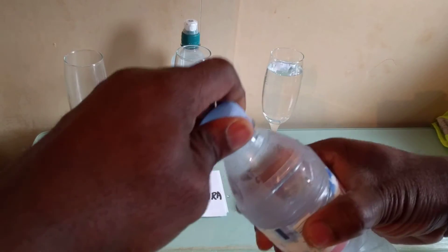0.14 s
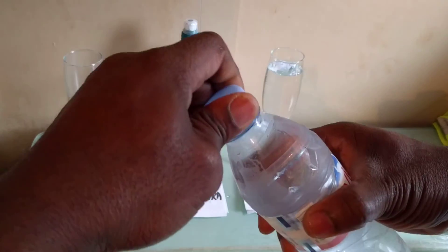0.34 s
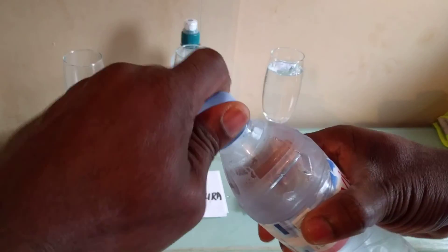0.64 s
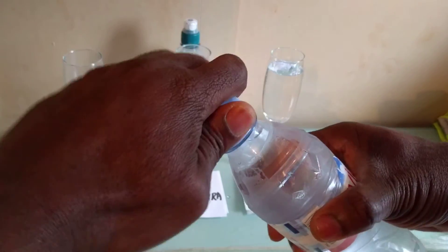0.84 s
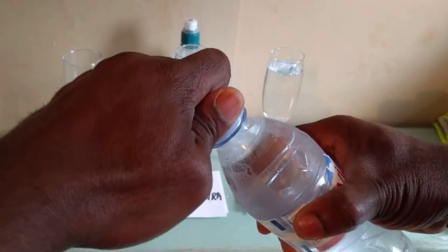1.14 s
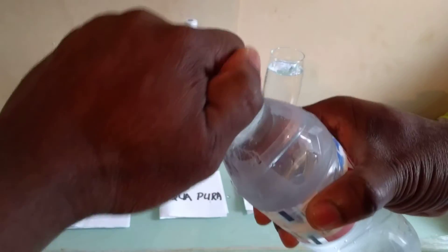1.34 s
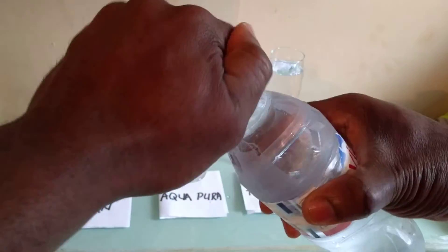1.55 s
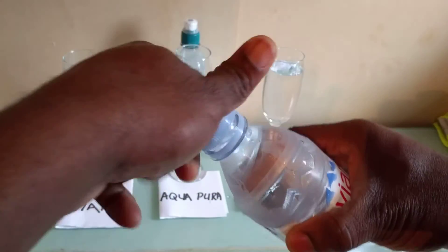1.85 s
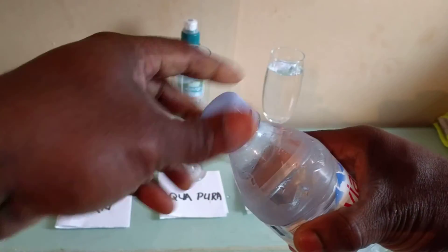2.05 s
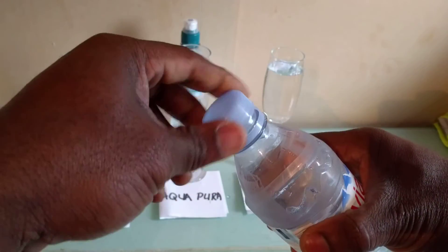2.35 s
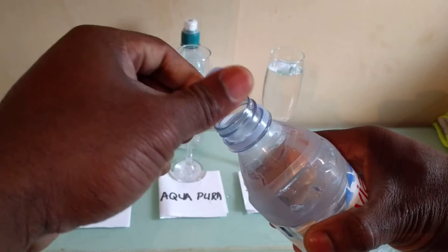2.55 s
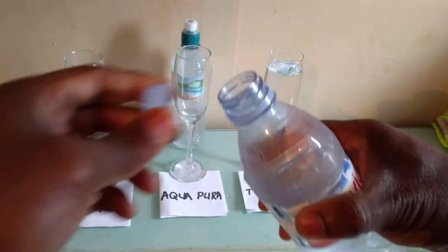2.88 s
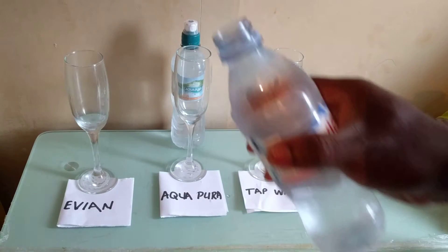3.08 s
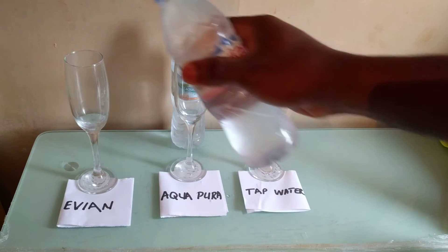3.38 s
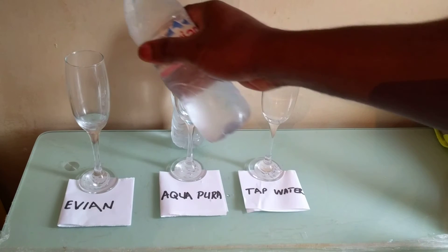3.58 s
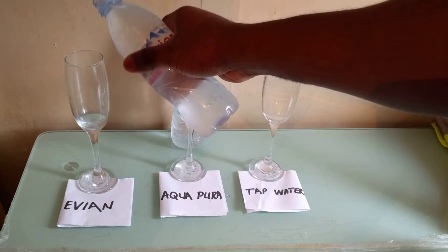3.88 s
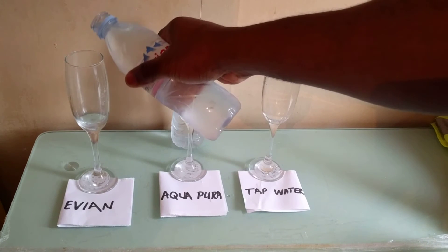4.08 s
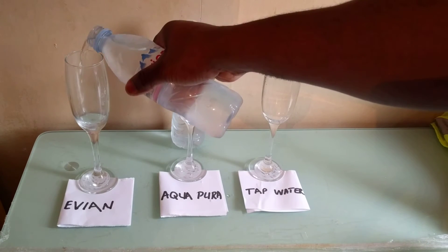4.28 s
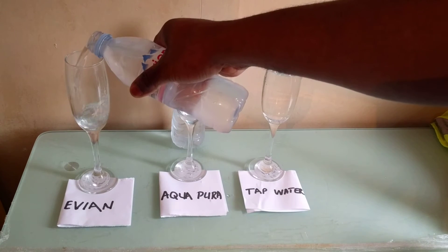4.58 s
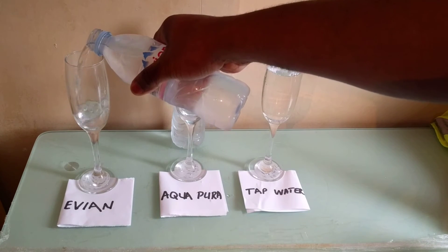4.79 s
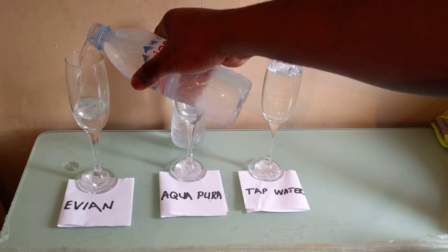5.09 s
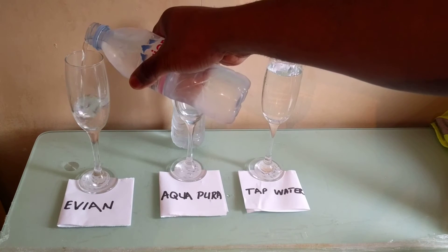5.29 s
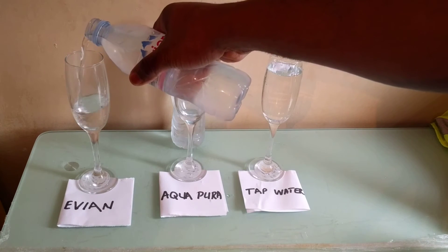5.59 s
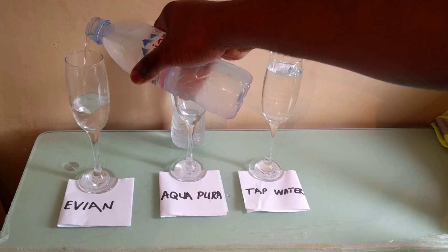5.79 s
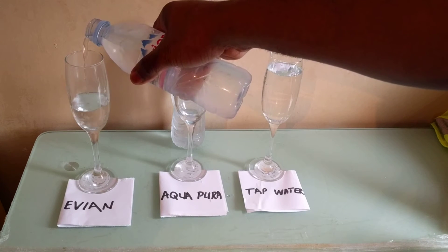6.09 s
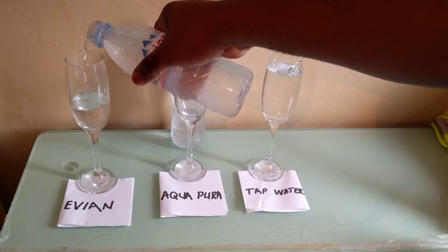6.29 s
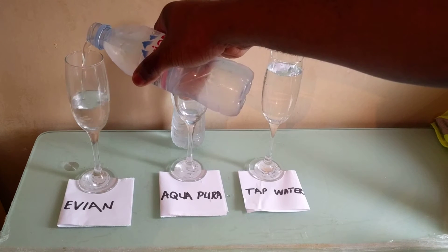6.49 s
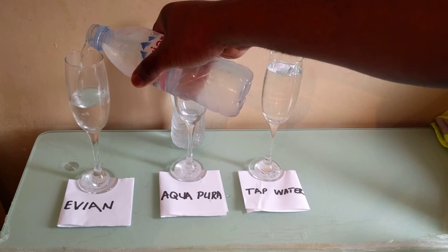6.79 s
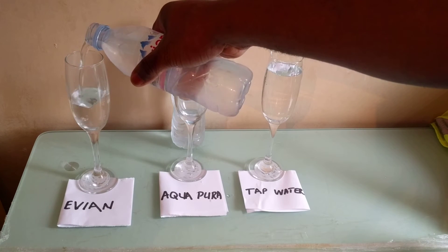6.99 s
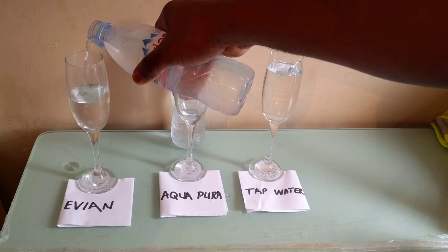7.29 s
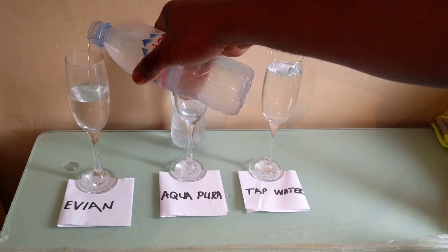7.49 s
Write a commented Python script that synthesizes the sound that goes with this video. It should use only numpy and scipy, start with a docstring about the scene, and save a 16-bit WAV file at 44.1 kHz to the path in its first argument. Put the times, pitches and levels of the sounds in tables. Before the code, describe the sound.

Close to the microphone, fingers twist a plastic cap off a water bottle: a few ticks, hard bright cracks as the seal breaks, gritty thread scrapes and small clicks. After a quiet gap and a faint hand rustle, water trickles into a tall glass with splats, bubbles and glugs, then thins to sparse drips. Small quiet room, steady hiss and low rumble.

```python
"""Fingers twist a plastic cap off a water bottle close by: the seal snaps, the thread scrapes, the bottle creases.
Then an unsteady trickle falls into a tall glass: splats, bubbles and glugs, the glass ringing faintly.
A small quiet room answers, over steady hiss and low rumble.
Snaps and splats are noise bursts through resonances, bubbles are fading sines, scrapes and flow are shaped noise."""
import sys
import numpy as np
from scipy import signal
from scipy.fft import rfft, irfft, next_fast_len
from scipy.io import wavfile
from scipy.ndimage import uniform_filter1d, map_coordinates

SR = 44100
rng = np.random.default_rng(int(sys.argv[2]) if len(sys.argv) > 2 else 0)


def unload_audio(sound):
    """Save the sound as a 16-bit wav file, at the path given as the first command line argument."""
    columns = np.transpose(np.atleast_2d(sound))
    # keep every value between -1 and 1, then stretch to whole-number steps
    steps = np.round(np.clip(columns, -1, 1) * 32767)
    wavfile.write(sys.argv[1], SR, steps.astype(np.int16))


N = 336953  # length of the scene [samples]

# In all tables and settings, t60 is the time a sound takes to fade by 60 dB.
# Drops striking water or glass:
# (time [s], level before a fixed cut [dB], brightness [dB per octave], glass ring against that level [dB])
DROPS = [(4.331, -47, 12, -27), (4.3737, -50, 8, -38), (4.4064, -50, 12, -33), (4.4642, -48, 9.5, -19),
         (4.5244, -38, 3, -18.5), (4.545, -28.5, 15, -31), (4.5899, -33, 17, -42), (4.6483, -37, 0.9, -31),
         (4.7202, -31.5, 2, -45), (4.8265, -37, 6.5, -18), (4.876, -46, 0.5, -19), (4.9493, -46, 3, -23),
         (4.968, -33.5, 1.5, -36), (4.998, -27.5, 8, -26.5), (5.1098, -40, 10, -35),
         (5.1976, -51.5, -3, -15), (5.2155, -45.5, 4, -17), (5.2335, -49, 1.5, -22),
         (5.2471, -30, 6.5, -35), (5.3263, -36.5, 8, -30), (5.386, -42.5, 1.2, -14), (5.4844, -43, 12, -36),
         (5.5114, -49.5, -.6, -18), (5.595, -46.5, 2, -32), (5.623, -39, 8, -33), (5.659, -55, 0, -24),
         (5.7265, -47, 2.5, -28), (5.7852, -43, 14, -29), (5.8083, -44, 9, -27), (5.8395, -24.5, 15.5, -38),
         (5.861, -31.5, 5, -30), (5.9007, -40.5, -1, -9), (5.9229, -32, 7.5, -41),
         (6.0219, -43.5, 2.1, -32), (6.0664, -49, 15, -35), (6.0833, -42.5, 11, -33),
         (6.1549, -51, 14, -30), (6.2092, -45.5, 3.5, -27), (6.259, -44, 2, -33), (6.4198, -48, 8, -34),
         (6.5046, -57.5, -4, -7), (6.6198, -63, 6, -17), (6.7825, -57, 11, -20), (6.872, -50, -2.5, -5),
         (6.967, -51, 13, -24), (7.2005, -59, 6, -21), (7.2383, -63, -1, -22), (7.3202, -42, 18, -35),
         (7.3467, -60, 5, -23), (7.418, -51, 4, -25), (7.5337, -60, -4, -20)]
# How strongly the water runs: (time [s], bubbling level [dB], spray level [dB])
WATER_FLOW = [(4.25, -88, -85), (4.42, -84, -76), (4.56, -73, -68), (4.68, -70.5, -56), (4.89, -70, -77.5),
              (5.0, -68.5, -52), (5.08, -67.5, -72), (5.25, -66.5, -75), (5.44, -72, -72),
              (5.57, -72.5, -73), (5.86, -76.5, -73), (6.03, -93, -77), (6.23, -74, -75), (6.57, -86, -84),
              (7.12, -91, -85), (7.64, -86, -85)]


def amp(db):
    """Turns decibels into a plain factor."""
    return 10 ** (np.asarray(db) / 20)


def unit(x):
    """Scales a sound to an average strength (rms) of 1."""
    return x / np.sqrt(np.mean(x ** 2) + 1e-20)


def along(points, hz):
    """Reads a curve of (Hz, value) points on a log frequency axis."""
    f, v = np.transpose(points)
    return np.interp(np.log(hz + 1), np.log(f + 1), v)


def curves(rows):
    """One value per sample for each column after the time; practically silent outside the table."""
    s, *cols = np.transpose(rows)
    return [np.interp(np.arange(N) / SR, s, c, left=-150, right=-150) for c in cols]


def wobble(rate):
    """A smooth random curve through `rate` random points a second."""
    points = rng.standard_normal(int(N * rate / SR) + 4)
    return map_coordinates(points, [np.arange(N) * rate / SR])


def filtered(x, response):
    """Multiplies the spectrum of x by a complex response of frequency."""
    m = next_fast_len(N + SR // 2)
    return irfft(rfft(x, m) * response(np.fft.rfftfreq(m, 1 / SR)), m)[..., :N]


def resonant(x, modes):
    """Sends x through resonances (Hz, width Hz, dB), scaled so that white noise keeps its power."""
    def gain(f):
        total = 0
        for k, (center, width, db) in enumerate(modes):
            peak = 1j * f * width / (center * center - f * f + 1j * f * width)
            total = total + (-1) ** k * amp(db) * peak  # neighbours have opposite signs
        return total

    return filtered(x, gain) / np.sqrt(np.mean(abs(gain(np.arange(SR // 2))) ** 2))


def narrow(hz, width_hz):
    """A band of noise, rms 1, around a moving pitch."""
    slow = filtered(rng.standard_normal((2, N)), lambda f: 1 / (1 + (f / width_hz) ** 2))
    phase = 2 * np.pi * np.cumsum(hz) / SR
    return unit(slow[0] * np.cos(phase) + slow[1] * np.sin(phase))


def laid(times, rows):
    """Adds each row of samples into the scene at its start time."""
    at = np.round(np.asarray(times) * SR).astype(int)[:, None] + np.arange(rows.shape[1])
    return np.bincount(at.ravel(), rows.ravel(), N + SR)[:N]


def bursts(times, db, shares_db, t60, groups, spiky_db):
    """A sharp crack with a fading, spiky noise tail drives each group of resonances by its own share."""
    t = np.arange(SR // 20) / SR
    noise, spikes = rng.standard_normal((len(times), 2, len(t))).transpose(1, 0, 2)
    shape = amp(-60 * t / t60) * (1 + 1.39 * np.exp(-t / 0.00066))
    burst = amp(spiky_db * unit(uniform_filter1d(spikes, size=12))) * noise * shape
    # every burst gets the energy of its smooth shape
    burst = burst * np.linalg.norm(shape, axis=-1, keepdims=True) / np.linalg.norm(burst, axis=1, keepdims=True)
    out = np.zeros(N)
    for share, modes in zip(shares_db, groups):
        out += resonant(laid(times, amp(db + share)[:, None] * burst), modes)
    return out


def rings(times, hz, db, t60, attack, rise, waver, size):
    """Fading sines whose pitch climbs by the share `rise` during t60 and wavers at random."""
    t = np.arange(size) / SR
    hz, db, t60, waver = (np.reshape(v, (-1, 1)) for v in (hz, db, t60, waver))
    drift = waver * np.cumsum(rng.standard_normal((len(times), size)), axis=1) * np.sqrt(hz / SR)
    turns = hz * (t + rise * t * t / (2 * t60)) + drift
    strength = amp(db - 60 * t / t60) * (1 - np.exp(-t / attack))
    return laid(times, strength * np.sin(2 * np.pi * turns))


def floor():
    """Steady rumble and hiss are noise with a shaped spectrum; a narrow band adds a fuzzy tone."""
    # Spectrum of rumble and hiss: (frequency [Hz], relative level [dB])
    hiss_spectrum = [(13, -66), (22, 8.5), (60, -2.5), (149, -6), (176, -12.5), (238, -9.5), (281, -11),
                     (314, -15.5), (476, -14), (926, -17), (1090, -22), (1360, -20), (8970, -27),
                     (15200, -20.5), (16500, -46.5)]
    # The fuzzy tone: (pitch [Hz], width [Hz], level [dB])
    whine = (1105, 28, -79)
    hiss_db = -63.5
    hiss = unit(filtered(rng.standard_normal(N), lambda f: amp(along(hiss_spectrum, f))))
    hz, width, db = whine
    tone = resonant(rng.standard_normal(N), [(hz, width, 0)])
    return amp(hiss_db + 0.49 * wobble(1.0)) * hiss + amp(db) * tone


def snaps():
    """Plastic lets go suddenly: seal, thread and bottle wall crack; the cap rings at a pitch set by the grip.
    Returns the direct sound and a shorter burst with a softer ring, which feeds the room tail."""
    # Cap and bottle snaps, with the level of each part that answers:
    # (time before a fixed 0.9 ms delay [s], neck [dB], wall [dB], rim [dB], crack [dB], cap ring [dB])
    snap_table = [(.147, -78, -76, -57.5, -58, -75), (.563, -82, -82, -61, -70, -63),
                  (0.603, -75, -59, -36.5, -33.5, -29.5), (0.614, -64, -65, -54, -52, -43),
                  (.637, -73, -62, -58, -64, -43.5), (0.839, -75, -46, -41.5, -50, -51),
                  (1.309, -47.5, -38, -29, -23.5, -63), (1.388, -63, -60, -60, -34, -66),
                  (1.434, -78, -63, -53, -68, -76), (1.463, -77, -63.5, -54, -53, -76),
                  (1.629, -61, -31, -28, -28, -21.5), (1.655, -45.5, -24, -20, -20.5, -23.5),
                  (1.691, -57, -35, -23, -19.5, -34.5), (1.825, -58, -57, -45.5, -46, -64),
                  (1.88, -27, -37, -44, -35, -53), (1.939, -44.5, -51, -66, -52, -40),
                  (1.944, -54, -41, -58, -44.5, -33), (2.133, -43.5, -42.5, -41.5, -37.5, -38),
                  (2.238, -58, -62, -70, -66, -56), (2.253, -45.5, -52, -47, -45, -50),
                  (2.258, -74, -45, -59, -58, -51), (2.347, -58, -51, -73, -64, -54),
                  (2.406, -58, -61, -51, -45, -54), (2.445, -61, -63, -58, -53, -58),
                  (3.049, -67, -65, -51, -51, -77), (3.116, -73, -59, -46.5, -38.5, -77),
                  (3.175, -52.5, -34, -33, -25, -45), (3.22, -61, -59, -50, -46, -64),
                  (3.259, -65, -59, -57, -52, -71), (3.927, -74, -62, -68, -60, -75)]
    # Pitch of the cap ring as the grip changes: (time [s], pitch [Hz])
    grip = [(.6, 4215), (.64, 4220), (.84, 3870), (1.63, 3475), (1.7, 3415), (1.94, 3880), (2.13, 3910),
            (2.4, 3600), (3.18, 4670)]
    # Resonances of the neck, wall, rim and crack: each (frequency [Hz], width [Hz], relative level [dB])
    plastic = [
        [(790, 280, 0), (1400, 900, -5)],
        [(2000, 1100, -1.5), (3700, 2000, 0)],
        [(5400, 1800, 0), (8500, 2600, 0)],
        [(11000, 3000, -2.2), (14000, 3500, 0)],
    ]
    loudest_t60_s, longer_per_db = 0.031, 0.02  # a snap at 0 dB; weaker ones die sooner by this share a dB
    short_t60_s = .0012
    s, *parts_db, ring_db = np.transpose(snap_table)
    t60 = loudest_t60_s * np.exp(longer_per_db * np.max(parts_db, axis=0))
    hz = np.interp(s, *np.transpose(grip))
    s = s + .3 / 343  # all snaps start 0.9 ms after their table times
    ring = rings(s, hz, ring_db, 1.8 * t60, attack=.0004, rise=0, waver=.05, size=SR // 10)
    short_db = 10 * np.log10(t60 / short_t60_s) - 3.5  # makes up for the shorter burst
    short = bursts(s, short_db, parts_db, short_t60_s, plastic, spiky_db=-1.5)
    direct = bursts(s, 0, parts_db, t60[:, None], plastic, spiky_db=2.5)
    return direct + ring, short + 0.55 * ring


def room(x, size=SR // 8):
    """Each frequency dies at its own speed; each eighth of a second of sound gets a fresh random noise tail."""
    # How long the room rings: (frequency [Hz], t60 [s])
    room_fade = [(500, 0.098), (1500, 0.19), (3500, 0.15), (10000, 0.13)]
    out = np.zeros(N + SR)
    for start in range(0, N, size):
        hz, t, z = signal.stft(rng.standard_normal(SR // 3), SR, nperseg=128)
        fading = z * amp(-60 * t / along(room_fade, hz)[:, None])
        tail = signal.istft(fading, SR, nperseg=128)[1]
        answer = signal.fftconvolve(x[start:start + size], tail / np.linalg.norm(tail))
        out[start + 260:][:len(answer)] += answer  # about 6 ms after the direct sound
    return out[:N]


def scrape():
    """Clumped sticking and slipping stirs the cap and the air in the neck, whose pitch glides as the cap turns."""
    # The cap scrapes on its thread: (start [s], hardest [s], end [s], grit level [dB], rasp level [dB],
    # rasp pitch [Hz], neck air level [dB], neck air from [Hz], neck air to [Hz])
    strokes = [(0.553, 0.577, .61, -56, -61, 4290, -62, 900, 905),
               (1.242, 1.268, 1.31, -54.5, -71, 4000, -70, 1190, 1096),
               (1.64, 1.704, 1.787, -37.5, -49, 3380, -81, 1002, 1007),
               (1.722, 1.79, 1.98, -55, -65, 3640, -63, 2050, 2260),
               (1.88, 1.892, 1.95, -75, -70, 3800, -58, 845, 796),
               (2.308, 2.354, 2.47, -54.5, -52.5, 3760, -59, 2200, 2200),
               (2.363, 2.404, 2.45, -57, -57.5, 3760, -47.5, 949, 1554),
               (2.408, 2.457, 2.51, -58, -64, 3700, -58, 1200, 2006)]
    fade_db = 27  # from the hardest moment to either end
    slips = amp(4 * wobble(400) + 2 * wobble(45))
    grit_modes = [(2400, 6600, 0.5), (5800, 3800, 7.5), (13500, 38000, 2.5)]
    grit = unit(resonant(slips * rng.standard_normal(N), grit_modes))
    out, t = np.zeros(N), np.arange(N) / SR
    for start, hardest, end, grit_db, rasp_db, rasp_hz, neck_db, from_hz, to_hz in strokes:
        reach = np.interp(t, [start, hardest, end], [1, 0, 1])  # 0 at the hardest moment, 1 at the ends
        pressure = amp(-fade_db * reach ** 1.35) * (reach < 1)
        rasp = unit(slips * narrow(np.full(N, rasp_hz), width_hz=310))
        neck = unit(slips * narrow(np.interp(t, [start, end], [from_hz, to_hz]), width_hz=280))
        out += pressure * (amp(grit_db) * grit + amp(rasp_db) * rasp + amp(neck_db) * neck)
    return out


def rustle():
    """Skin slides over the bottle wall: unsteady noise through two broad resonances."""
    # The hand shifts on the bottle: (time [s], level [dB])
    hand_shift = [(3.26, -67.5), (3.4, -72.5), (3.5, -67.5), (3.62, -68), (3.75, -73.5), (3.95, -81)]
    skin = amp(1.5 * wobble(87)) * rng.standard_normal(N)
    return amp(curves(hand_shift)[0]) * unit(resonant(skin, [(2150, 4900, 0), (12900, 2600, -1.5)]))


def gurgle():
    """Water and air change places low in the bottle: wandering low noise in bell-shaped swells."""
    # Swells: (middle [s], length [s], level at the middle [dB])
    swell_table = [(4.102, 0.8, -77), (5.185, 0.76, -66), (5.858, 0.42, -67.5)]
    t = np.arange(N) / SR
    swells = np.zeros(N)
    for middle, length, db in swell_table:
        swells += amp(db) * np.cos(np.pi * np.clip((t - middle) / length, -.5, .5))
    return swells * unit(amp(2.9 * wobble(12)) * narrow(330 + 70 * wobble(6), width_hz=150))


def hums():
    """Soft low tones: each a steady sine under a bell-shaped swell."""
    # Faint hums: (start [s], length [s], pitch [Hz], level at the middle [dB])
    hum_table = [(3.72, 0.12, 457, -64), (4.08, 0.1, 218, -65.5), (4.29, 0.087, 154, -63.5),
                 (5.14, 0.093, 242, -64), (5.277, 0.12, 255.5, -66), (5.67, 0.17, 143, -60.5),
                 (5.815, 0.14, 330, -60.5)]
    s, length, hz, db = np.transpose(hum_table)[:, :, None]
    t = np.arange(SR // 4) / SR
    swell = np.sin(np.pi * np.clip(t / length, 0, 1))
    return laid(s[:, 0], amp(db) * swell * np.sin(2 * np.pi * hz * t))


def swarm(low_hz, high_hz, count):
    """Small random bubbles ring in clumps; rms 1 from the start of the flow."""
    start = WATER_FLOW[0][0]
    u, size_db = rng.random((count, 3)), 6.5 * rng.standard_normal(count)
    times = start + u[:, 0] * (N / SR - start)
    hz = low_hz * (high_hz / low_hz) ** u[:, 1]
    t60 = (12 + 60 * u[:, 2]) / hz  # 12 to 72 turns
    small = rings(times, hz, size_db, t60, attack=0.0012, rise=.15, waver=0.046, size=800)
    small = small * amp(3 * wobble(35))
    return small / small[int(start * SR):].std()


def trickle():
    """Bubbling and spray follow the flow over a wash of noise, and stir the air column above the water."""
    # Resonances of the air above the water: (frequency [Hz], width [Hz], relative level [dB])
    air_column = [(992, 186, 23), (2080, 130, -12), (3180, 280, -35)]
    shallow_db, deep_db = -4, 2  # air column against the bubbling, before and after the water pools
    pool_s, fill_s = 5.02, 0.59  # middle and length of that change
    bubbling_db, spray_db = curves(WATER_FLOW)
    change_s = [pool_s - fill_s / 2, pool_s + fill_s / 2]
    column_db = bubbling_db + np.interp(np.arange(N) / SR, change_s, [shallow_db, deep_db])
    column = unit(resonant(amp(3.0 * wobble(40)) * rng.standard_normal(N), air_column))
    wash_noise = amp(13.0 * wobble(60)) * rng.standard_normal(N)
    wash = unit(resonant(wash_noise, [(2280, 630, 0), (3970, 8200, -2)]))
    bubbling, spray = swarm(1773, 6800, count=3200), swarm(6160, 15800, count=4000)
    return amp(bubbling_db) * (bubbling + 0.28 * wash) + amp(spray_db) * spray + amp(column_db) * column


def splats():
    """Each drop cracks on the surface and sets the wall of the glass ringing."""
    # Three groups of splash resonances: each (frequency [Hz], width [Hz], relative level [dB])
    water = [
        [(2150, 210, -2.5), (3480, 490, 2)],
        [(5270, 940, 0), (7900, 2200, 0)],
        [(12900, 3100, 0.014), (15500, 2500, 0.045)],
    ]
    # How far each group lies above the lowest: (distance [octaves])
    water_octaves = [0, 1.25, 2.3]
    # The ringing wall of the glass: (pitch [Hz], level against the drop's ring [dB], t60 [s])
    glass = [(1952, -8.5, 0.43), (5300, -20, 0.19), (8300, -20, 0.14)]
    middle_dip_db = -1  # the middle group is weaker
    s, db, brightness, ring_db = np.transpose(DROPS)
    shares = brightness * np.c_[water_octaves] + np.c_[[0, middle_dip_db, 0]]
    shares = shares - shares.max(axis=0)  # the strongest group of each drop stands at 0 dB
    chance, each = rng.standard_normal((len(s), len(glass))), np.ones(len(s))
    wall = np.zeros(N)
    for k, (hz, level, t60) in enumerate(glass):
        wall_db = db + ring_db + level + 1.3 * chance[:, k]
        wall += rings(s, hz * each, wall_db, t60 * each, attack=0.00084, rise=0, waver=0.00078, size=SR // 4)
    return bursts(s, db - 10.5, shares, 0.028, water, spiky_db=2.5) + wall


def trapped(count=7):
    """Each drop drags a few small bubbles under; brighter drops make smaller, higher ones."""
    base_hz, octaves_per_db, top_hz = 2504, 0.33, 14000  # typical pitch, its rise with brightness, its limit
    under_db, spread_s = -19, 0.038  # level against the drop's, longest delay after it
    s, db, brightness, _ = np.repeat(DROPS, count, axis=0).T
    u, g = rng.random((len(s), 2)), rng.standard_normal((len(s), 2))
    hz = np.minimum(base_hz * 2 ** (octaves_per_db * brightness + 0.457 * g[:, 0]), top_hz)
    t60 = (30 + 70 * u[:, 1]) / hz  # 30 to 100 turns
    return rings(s + spread_s * u[:, 0], hz, db + under_db + 4 * g[:, 1], t60,
                 attack=0.0015, rise=0.083, waver=0.044, size=SR // 20)


def bubbles():
    """The loudest bubbles and glugs: trapped air rings at a pitch set by its size; the shorter, the less steady."""
    # (time [s], pitch at the start [Hz], level before a fixed boost [dB], t60 [s])
    bubble_table = [(4.407, 7640, -38.5, .02), (4.423, 8340, -50, .027), (4.5, 1986, -48.5, 0.034),
                    (4.526, 5080, -48.5, .092), (4.527, 4200, -45.5, .032), (4.554, 11730, -40.5, .062),
                    (4.57, 7000, -36, 0.016), (4.584, 6360, -40, .018), (4.59, 9960, -39, 0.031),
                    (4.599, 6580, -32, .013), (4.641, 2315, -42.5, .022), (4.645, 1267, -56, 0.073),
                    (4.655, 6200, -44, 0.034), (4.683, 4300, -45.5, 0.039), (4.692, 2310, -47, .033),
                    (4.722, 3630, -22, 0.016), (4.723, 1294, -54, 0.066), (4.749, 1430, -45, 0.015),
                    (4.773, 1096, -40.5, 0.035), (4.787, 2040, -36.5, .012), (4.865, 2220, -50, .02),
                    (4.991, 4170, -56, .04), (4.997, 7150, -25.5, 0.022), (5.006, 2580, -44, 0.026),
                    (5.007, 1850, -52, 0.024), (5.02, 3720, -44, 0.026), (5.03, 4430, -37, 0.016),
                    (5.03, 9370, -39.5, 0.028), (5.032, 1210, -29.5, .013), (5.033, 11350, -38, .02),
                    (5.054, 881, -29, 0.065), (5.06, 2600, -50.5, 0.038), (5.062, 2050, -42, 0.019),
                    (5.071, 910, -35.5, 0.036), (5.092, 852, -50, 0.094), (5.186, 1127, -46, 0.054),
                    (5.207, 2580, -43, 0.026), (5.21, 1160, -57, .19), (5.234, 1232, -49, 0.062),
                    (5.247, 1035, -34, 0.024), (5.247, 2300, -37, 0.018), (5.254, 5060, -51.5, 0.24),
                    (5.285, 950, -40.5, 0.052), (5.286, 2920, -52, 0.034), (5.373, 4940, -48.5, 0.021),
                    (5.393, 2050, -50, 0.036), (5.393, 1100, -45.5, 0.041), (5.414, 936, -46.5, 0.041),
                    (5.512, 3270, -47.5, .036), (5.531, 926, -53.5, 0.04), (5.63, 8120, -54.5, .04),
                    (5.633, 1034, -57, .06), (5.718, 1058, -56, 0.081), (5.838, 3090, -36.5, .014),
                    (5.84, 1016, -44.5, 0.068), (5.862, 2070, -37, 0.015), (5.863, 1007, -25.5, 0.032),
                    (5.901, 2060, -37, 0.02), (5.902, 950, -26.5, .026), (5.912, 7000, -47, .027),
                    (5.921, 8850, -35, .02), (5.924, 3070, -32.5, .014), (5.927, 907, -43, 0.067),
                    (5.94, 946, -48, 0.057), (6.02, 1010, -57, 0.045), (6.022, 5300, -44, 0.021),
                    (6.2, 2050, -59, 0.037), (6.261, 4460, -41, .02), (6.373, 1080, -57.5, .04),
                    (6.499, 994, -58, 0.093), (6.504, 7670, -47.5, 0.022), (6.673, 1045, -57.5, 0.063),
                    (6.867, 1170, -49, 0.031), (6.869, 7450, -53, .043), (6.871, 6620, -49, 0.06),
                    (6.873, 5060, -61, .14), (7.24, 3540, -56.5, .025)]
    s, hz, db, t60 = np.transpose(bubble_table)
    return rings(s, hz, db + 7, t60, attack=0.0037, rise=0.016, waver=0.0083 + .0012 / t60, size=SR // 6)


def chirps():
    """Bubbles climb in pitch as they near the surface: unsteady upward glides under a bell-shaped swell."""
    # (start [s], length [s], from pitch [Hz], to pitch [Hz], level before the flutter [dB])
    chirp_table = [(4.828, .066, 2100, 4500, -56), (5.2, .05, 2400, 3600, -62),
                   (7.525, .03, 3000, 3700, -70)]
    s, length, low_hz, high_hz, db = np.transpose(chirp_table)[:, :, None]
    u = np.clip(np.arange(SR // 10) / SR / length, 0, 1)  # progress from 0 to 1
    unsteady = .06 * np.cumsum(rng.standard_normal(u.shape), axis=1)
    hz = low_hz * (high_hz / low_hz) ** (u * u)
    phase = 2 * np.pi * np.cumsum(hz, axis=1) / SR + unsteady
    flutter = amp(5 * wobble(110))
    return flutter * laid(s[:, 0], amp(db) * np.sin(np.pi * u) * np.sin(phase))


def scene():
    """Mixes the hands, the water, the room's answer and the steady background."""
    snap, short_snap = snaps()
    rub = scrape() + rustle()
    near = snap + rub
    near = near + 0.14 * np.pad(near, (85, 0))[:N]  # the table top throws the cap's sound back 2 ms later
    no_bass = lambda hz: (1j * hz / (300 + 1j * hz)) ** 2  # the near sounds hold little bass below about 300 Hz
    near, far = filtered(np.array([near, short_snap + rub]), no_bass)
    splash = splats() + trickle()
    air = bubbles() + chirps() + trapped()
    answer = room(amp(-9) * far + amp(-5.0) * splash + amp(-8.5) * air)
    return (near + splash + air + answer + gurgle() + hums() + floor())[None]


def record(dry):
    """The finished sound has little deep bass, falls steeply above 15.7 kHz and holds nothing above 16.8 kHz."""
    # Tone balance: (frequency [Hz], gain [dB])
    tone_balance = [(10, -32), (28, -23), (50, 2.5), (15700, 0.5), (16050, -20), (17000, -28)]
    top_hz = 16800
    return filtered(dry, lambda hz: amp(along(tone_balance, hz)) * (hz < top_hz))


dry = scene()
out = record(dry)
unload_audio(out)
```